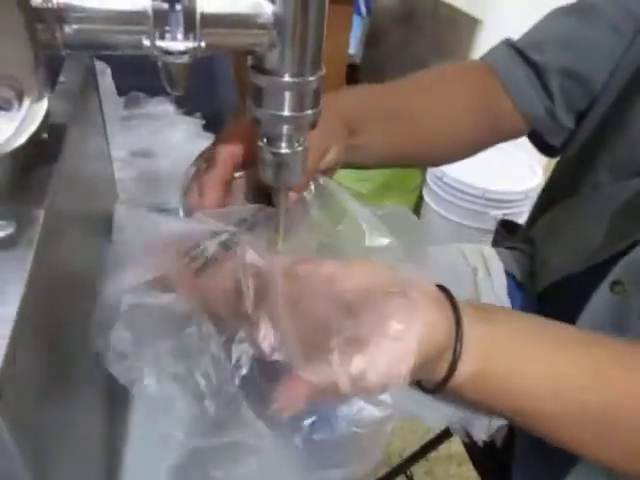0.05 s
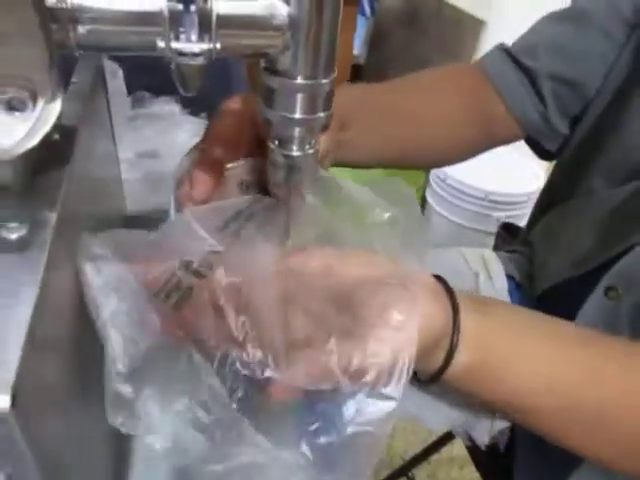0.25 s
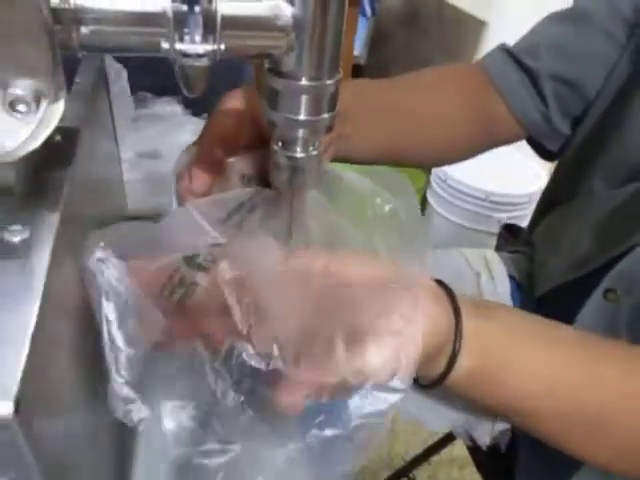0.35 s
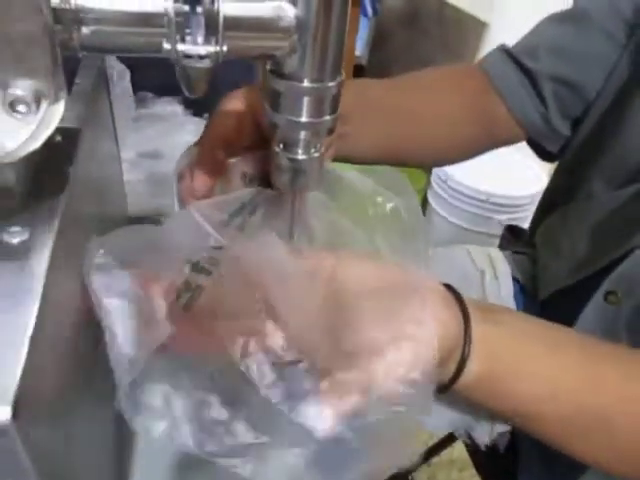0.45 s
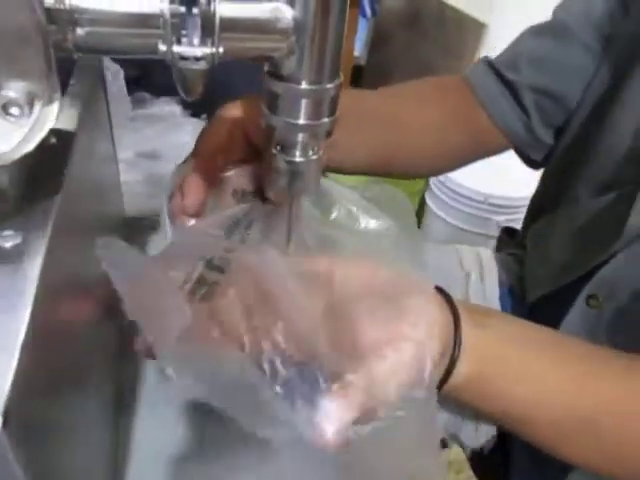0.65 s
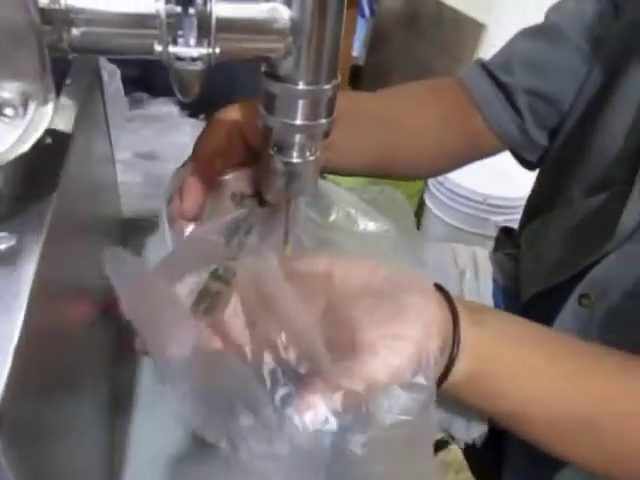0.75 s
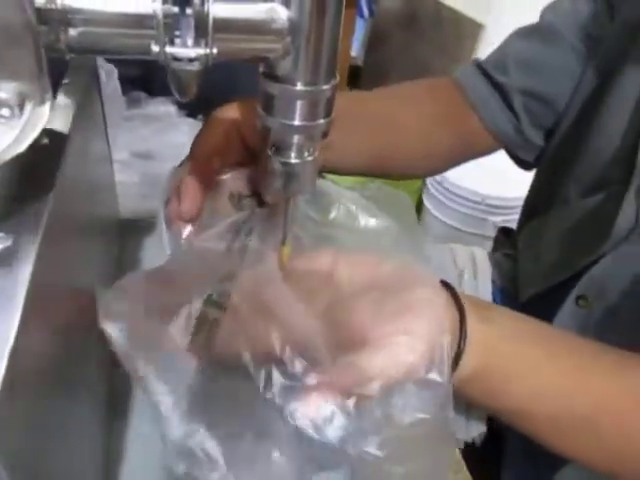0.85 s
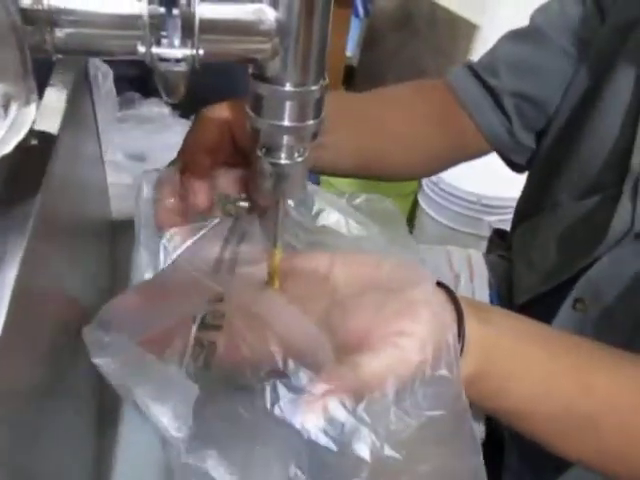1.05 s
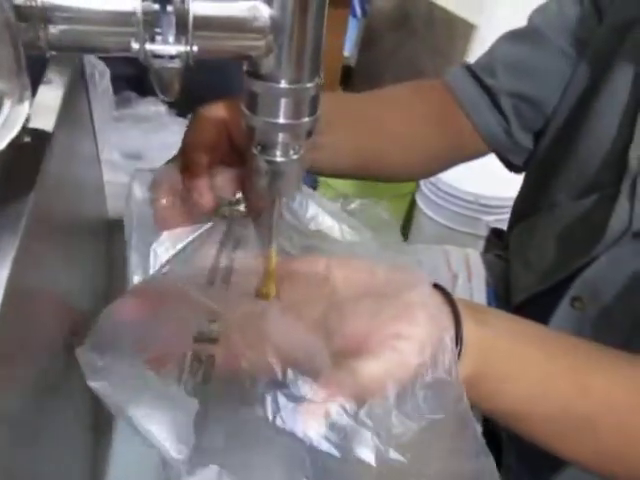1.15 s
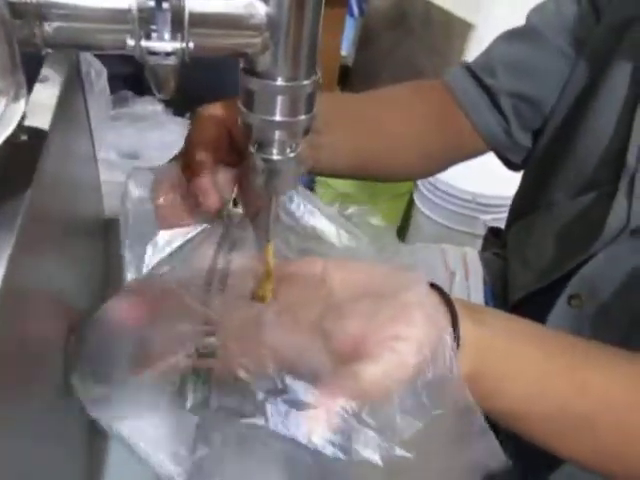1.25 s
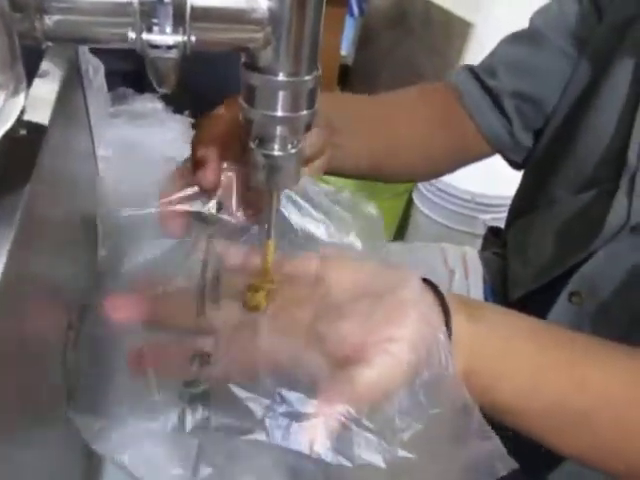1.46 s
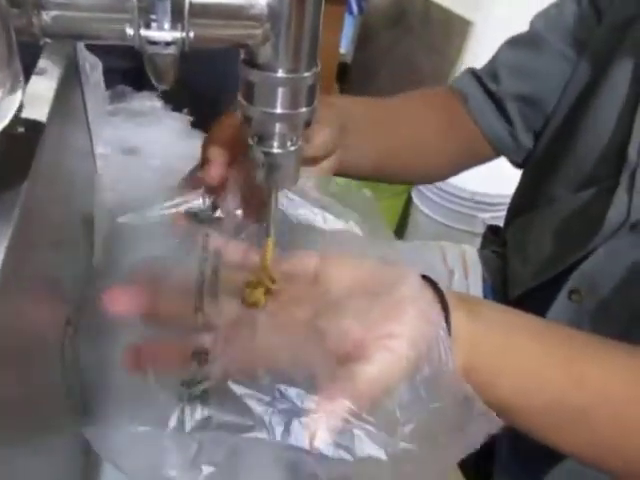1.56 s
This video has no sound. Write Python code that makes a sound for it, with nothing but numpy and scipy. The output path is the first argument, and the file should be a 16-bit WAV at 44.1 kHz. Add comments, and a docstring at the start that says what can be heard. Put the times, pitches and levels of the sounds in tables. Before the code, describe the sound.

Close up in a small workshop, a filling machine's air cylinder clacks loudly, puffs and knocks against its stop with a tiny squeak. Air then hisses quietly, with light plastic bag crinkles over a low rumble.

```python
"""Pneumatic piston filler, one stroke

Close up in a small workshop, a valve ticks, metal cracks on metal and the cylinder thumps its frame.
Air puffs out, a seal squeaks and the mechanism knocks against its stop. Then air hisses through
the throttle as the piston pushes out the dose. A plastic bag crinkles under the nozzle;
soft bumps, a short echo and a low rumble lie behind."""
import sys
import numpy as np
from scipy import signal
from scipy.fft import rfft, irfft
from scipy.io import wavfile
from scipy.ndimage import uniform_filter1d

SR = 44100
rng = np.random.default_rng(int(sys.argv[2]) if len(sys.argv) > 2 else 0)


def generate_wav(signal):
    """Clip the signal to [-1, 1] and save it as 16-bit WAV at the path in sys.argv[1]."""
    frames = np.transpose(np.atleast_2d(signal))
    scaled = np.clip(frames, -1, 1) * 32767
    pcm = np.round(scaled).astype(np.int16)
    wavfile.write(sys.argv[1], SR, pcm)


N = 70560
T = np.arange(N) / SR
BIN_HZ = np.fft.rfftfreq(N, 1 / SR)


def amp(db):
    """Decibels to gain."""
    return 10 ** (np.asarray(db) / 20)


def unit_rms(x):
    """Scales to rms 1."""
    return x / np.sqrt(np.mean(x ** 2) + 1e-20)


def over_frequency(points, hz):
    """Interpolates a table on a log-frequency axis."""
    freq_hz, value = np.transpose(points)
    return np.interp(np.log(hz + 1), np.log(freq_hz + 1), value)


def envelope(points):
    """Gain over time from (time_s, level_db) points."""
    return amp(np.interp(T, *np.transpose(points)))


def since(start_s):
    """Seconds since the start, zero before it."""
    return np.maximum(T - start_s, 0)


def attack(start_s, rise_s):
    """Linear ramp from 0 to 1."""
    return np.minimum(since(start_s) / rise_s, 1)


def decay(start_s, t60_s):
    """Sudden onset, exponential fade."""
    return (T >= start_s) * amp(-60 * since(start_s) / t60_s)


def ring(start_s, modes):
    """Struck modes as decaying sines."""
    return sum(amp(db) * decay(start_s, t60_s) * np.sin(2 * np.pi * hz * since(start_s))
               for hz, db, t60_s in modes)


def bells_db(peaks):
    """Summed bell-shaped peaks or dips per frequency bin."""
    return sum(db / (1 + (2 * (BIN_HZ - hz) / width_hz) ** 2) for hz, width_hz, db in peaks)


def colour(x, spectrum, peaks=(), tilt_db_per_octave=0):
    """Filters by a spectrum, resonances and a tilt above 500 Hz; rms 1."""
    tilt_db = tilt_db_per_octave * np.log2(np.maximum(BIN_HZ, 500))
    gain_db = over_frequency(spectrum, BIN_HZ) + tilt_db + bells_db(peaks)
    return unit_rms(irfft(rfft(x) * amp(gain_db), N))


def noise(spectrum, peaks=(), tilt_db_per_octave=0):
    """Coloured noise at rms 1."""
    return colour(rng.standard_normal(N), spectrum, peaks, tilt_db_per_octave)


def low_cut(x, hz):
    """Second-order high-pass."""
    return signal.sosfilt(signal.butter(2, hz, "high", fs=SR, output="sos"), x)


# Metal contacts: start_s, level_db
CRACKS = [(.2247, -12), (0.226, 3), (.2277, -11)]
# Metal modes: pitch_hz, gain_db, t60_s
CRACK_MODES = [(6640, -16, 0.014), (7920, 0.5, 0.0077), (8780, -4.5, 0.0089), (13140, -12, 0.0043),
               (14500, -17, .005)]

def cracks():
    """Metal hits metal in quick succession, making one bright clack."""
    return sum(amp(db) * attack(start_s, rise_s=0.0006) * ring(start_s, CRACK_MODES)
               for start_s, db in CRACKS)


# Cylinder blows: start_s, level_db
THUMPS = [(0.2287, -2.5), (0.2471, -20.5), (0.2978, -21.5), (.376, -19)]

def cylinder(pitch_hz=220, hold_s=0.0041, fall_s=0.004):
    """Each blow of the cylinder on the frame swings for about two cycles."""
    thumps = np.zeros(N)
    for start_s, db in THUMPS:
        damping = np.exp(-(since(start_s + hold_s) / fall_s) ** 2)
        swing = np.sin(2 * np.pi * pitch_hz * since(start_s))
        thumps += amp(db) * attack(start_s, rise_s=0.00066) * damping * swing
    return thumps


# Blows that excite the frame: start_s, level_db
FRAME_BLOWS = [(0.2277, -3.5), (0.3269, 1.5)]
# Frame modes: pitch_hz, gain_db, t60_s
FRAME_MODES = [(158, -37.5, 0.57), (208, -22.5, 0.55), (287.4, -36, 0.8), (319.7, -45, 0.76),
               (428, -41.5, 0.72), (536.4, -40.5, 0.25), (601.3, -31, 0.15)]

def frame():
    """The struck frame rings on in its low modes."""
    return sum(amp(db) * ring(start_s, FRAME_MODES) for start_s, db in FRAME_BLOWS)


# Modes of the knock: pitch_hz, gain_db, t60_s
STOP_MODES = [(514, -11, 0.039), (876, -17, 0.039), (1376, -4, 0.025), (1690, -15.5, 0.033),
              (2200, -8, 0.024), (2570, -5.5, 0.016), (3250, -10, 0.0098), (5870, -10.5, .012)]

def end_stop(start_s=0.3211, gain_db=-7.5):
    """The mechanism hits its stop with a dry, hollow knock."""
    return amp(gain_db) * attack(start_s, rise_s=0.0012) * ring(start_s, STOP_MODES)


# Impact noise bursts: start_s, level_db, t60_s, tilt_db_per_octave
RATTLES = [(0.2104, -36.5, 0.074, -1.5), (.2252, -15.5, 0.045, -0.5), (0.2286, -14, 0.056, 0),
           (0.321, -15.5, 0.04, -1), (0.377, -30, 0.11, 1)]
# Rattle spectrum: freq_hz, gain_db
RATTLE_SPECTRUM = [(60, -32), (550, 4), (780, -6.5), (1400, 1), (3000, -4.5), (5000, -8), (7800, -0.5),
                   (10500, -8), (16000, -24)]

def rattles():
    """The short, noisy part of each impact."""
    return sum(amp(db) * decay(start_s, t60_s) * noise(RATTLE_SPECTRUM, tilt_db_per_octave=tilt)
               for start_s, db, t60_s, tilt in RATTLES)


# Valve modes: pitch_hz, gain_db, t60_s
VALVE_MODES = [(914, 0.5, 0.077), (1240, -3, 0.075), (1820, -6.5, 0.098), (2280, -9, 0.09)]

def valve(start_s=0.2097, gain_db=-25):
    """The valve ticks and rings briefly."""
    return amp(gain_db) * ring(start_s, VALVE_MODES)


# Exhaust air spectrum: freq_hz, gain_db
PUFF_SPECTRUM = [(40, -11), (120, -12), (300, 10.5), (780, -4), (1500, 2.5), (2500, -3.5), (3500, -8),
                 (6800, -4), (10000, -8), (12000, -9), (16000, -34)]

def exhaust(start_s=0.229, level_db=-29, sag_db_per_s=83, fade_start_s=0.424, fade_t60_s=0.69):
    """A puff of air sags with the pressure, then dies under an added fade."""
    db = level_db - sag_db_per_s * since(start_s) - 60 * since(fade_start_s) / fade_t60_s
    return attack(start_s, rise_s=0.001) * amp(db) * noise(PUFF_SPECTRUM)


# Squeak glide: time_s, pitch_hz
SQUEAK_PITCH = [(.295, 4790), (.314, 4745), (.322, 4723), (.328, 4611), (.338, 4584)]
# Squeak partials: harmonic_number, peak_db
SQUEAK_HARMONICS = [(1, -17), (2, -14.5), (3, -34)]

def seal(start_s=0.294, peak_s=0.3208, end_s=0.3405, edge_s=0.0056, rise_db_per_s=193, fall_db_per_s=380):
    """The seal squeaks near the stop, sinking in pitch; overtones swell and fade more steeply."""
    jitter = 0.003 * unit_rms(uniform_filter1d(rng.standard_normal(N), size=90))
    phase = 2 * np.pi * np.cumsum(np.interp(T, *np.transpose(SQUEAK_PITCH)) * (1 + jitter)) / SR
    swell_db = -rise_db_per_s * np.maximum(peak_s - T, 0) - fall_db_per_s * since(peak_s)
    gate = np.clip(np.minimum(T - start_s, end_s - T) / edge_s, 0, 1)
    squeak = np.zeros(N)
    for harmonic, peak_db in SQUEAK_HARMONICS:
        steepness = 1 + 4 * (harmonic - 1)
        squeak += amp(peak_db + steepness * swell_db) * np.sin(harmonic * phase)
    return gate * squeak


# Air flow envelope: time_s, level_db
FLOW_LEVEL = [(.3, -43), (.5, -50), (.7, -47.5), (.95, -45), (1.3, -43.5), (1.52, -43), (1.6, -41)]
# Air flow spectrum: freq_hz, gain_db
FLOW_SPECTRUM = [(300, -9), (850, -19), (1900, -2), (3200, -2), (4500, -2), (6300, -2), (8000, -9),
                 (9500, -17), (13000, -16), (16000, -29)]
# Pipe resonances: centre_hz, width_hz, gain_db
PIPE_PEAKS = [(2980, 36, 2.8), (3760, 280, 6.6), (8000, 97, 6.8), (12100, 230, 6)]
# Throttle envelope: time_s, level_db
THROTTLE_LEVEL = [(.3, -64), (.55, -54), (.7, -50), (.95, -48.5), (1.25, -49.5), (1.6, -52.5)]
# Narrow throttle band near 5.6 kHz: freq_hz, gain_db
THROTTLE_SPECTRUM = [(3000, -48), (5000, -21), (5290, 1), (5620, -1), (5790, 1.5), (6150, -13), (8000, -45)]

def airflow(start_s=0.21, flutter_db=0.6, flutter_s=0.02):
    """Air hisses, slightly unevenly, through the throttle and its pipe as the dose is pushed out."""
    pole = np.exp(-1 / (flutter_s * SR))
    flutter = unit_rms(signal.lfilter([1], [1, -pole], rng.standard_normal(N)))
    pipe = envelope(FLOW_LEVEL) * noise(FLOW_SPECTRUM, PIPE_PEAKS)
    throttle = envelope(THROTTLE_LEVEL) * noise(THROTTLE_SPECTRUM)
    return (T > start_s) * amp(flutter_db * flutter) * (pipe + throttle)


# Bag handling envelope: time_s, level_db
BAG_LEVEL = [(0, -40), (.04, -40.5), (.06, -48), (.12, -50), (.18, -55.5), (.6, -58), (1.1, -54.5),
             (1.25, -59), (1.37, -48), (1.45, -57), (1.6, -57)]
# Plastic spectrum: freq_hz, gain_db
BAG_SPECTRUM = [(400, 6.5), (800, -11), (2000, -1), (4000, -4), (8000, 2), (10500, 0.5), (12500, -4.5),
                (16000, -15)]
# Single snaps: start_s, level_db
BAG_SNAPS = [(.006, -45), (.071, -34.5), (0.1419, -40), (0.174, -39.5), (0.1953, -31), (.926, -41),
             (1.316, -35), (1.364, -36.5)]

def bag(crinkles_per_s=2500, spread_db=1.5):
    """Handled thin plastic gives dense tiny crinkles and a few larger snaps."""
    sizes = amp(spread_db * np.minimum(rng.exponential(1, N), 4)) * rng.standard_normal(N)
    clicks = sizes * (rng.random(N) < crinkles_per_s / SR)
    crinkles = envelope(BAG_LEVEL) * colour(clicks, BAG_SPECTRUM)
    snap_gain = sum(amp(db) * decay(start_s, t60_s=0.016) for start_s, db in BAG_SNAPS)
    return crinkles + snap_gain * noise(BAG_SPECTRUM)


# Soft bumps: start_s, level_db, t60_s
BUMPS = [(0.201, -36.5, 0.078), (.281, -31.5, 0.063), (0.69, -42, 0.15), (1.582, -43.5, 0.071)]
# Bump spectrum: freq_hz, gain_db
BUMP_SPECTRUM = [(100, -28), (450, -1), (900, -15.5), (1400, -6.5), (3000, -16), (8000, -23.5)]
# Hollow resonance: centre_hz, width_hz, gain_db
BUMP_PEAKS = [(467, 32, 10)]

def bumps():
    """Soft, dull bumps around the machine."""
    gain = sum(amp(db) * decay(start_s, t60_s) for start_s, db, t60_s in BUMPS)
    return gain * noise(BUMP_SPECTRUM, BUMP_PEAKS)


# Workshop decay: freq_hz, t60_s
ROOM_DECAY = [(150, 0.52), (600, 0.58), (2000, 0.41), (8000, 0.25), (15000, 0.44)]

def room(x, delay_s=0.0087):
    """Diffuse workshop echo, each band dying at its own rate."""
    hz, time_s, bands = signal.stft(rng.standard_normal(N), SR, nperseg=256)
    fade = amp(-60 * time_s / over_frequency(ROOM_DECAY, hz)[:, None])
    tail = signal.istft(bands * fade, SR, nperseg=256)[1][:N] * (T > delay_s)
    echo = signal.fftconvolve(x, tail / np.linalg.norm(tail))[:N]
    return low_cut(echo, hz=125)


# Rumble envelope: time_s, level_db
RUMBLE_LEVEL = [(0, -42), (.12, -40), (.3, -44.5), (.8, -45), (1, -43.5), (1.15, -43.5), (1.45, -44),
                (1.6, -42)]
# Rumble spectrum: freq_hz, gain_db
RUMBLE_SPECTRUM = [(20, 0.5), (35, -4), (52, -1), (80, -5.5), (140, -7.5), (280, -13), (450, -21),
                   (800, -26), (2000, -25.5), (16000, -39)]
# Low drone: centre_hz, width_hz, gain_db
DRONE_PEAKS = [(53, 17, 6.5)]

def rumble():
    """Low workshop noise with a drone in it."""
    return envelope(RUMBLE_LEVEL) * noise(RUMBLE_SPECTRUM, DRONE_PEAKS)


def scene():
    """Machine and bag in the workshop, mono; air and rumble bypass the echo."""
    clatter = valve() + cracks() + rattles() + bag() + bumps()
    bass = cylinder() + frame()
    squeak = seal()
    knock = end_stop()
    echo = room(amp(-11.5) * clatter + amp(-16.5) * bass + amp(-19.5) * squeak + amp(-17.5) * knock)
    return (clatter + bass + squeak + knock + echo + rumble() + exhaust() + airflow())[None]


# Microphone dips: centre_hz, width_hz, gain_db
MIC_DIPS = [(773, 57, -9), (4780, 600, -12)]

def record(dry, cutoff_hz=15900):
    """The microphone colours the sound, peaks clip at full scale, a low-pass limits the band."""
    coloured = irfft(rfft(dry) * amp(bells_db(MIC_DIPS)), N)
    clipped = np.clip(low_cut(coloured, hz=45), -1, 1)
    low_pass = signal.firwin(511, cutoff_hz, window=("kaiser", 9), fs=SR)
    return signal.oaconvolve(clipped, low_pass[None], "same")


dry = scene()
out = record(dry)
generate_wav(out)
```